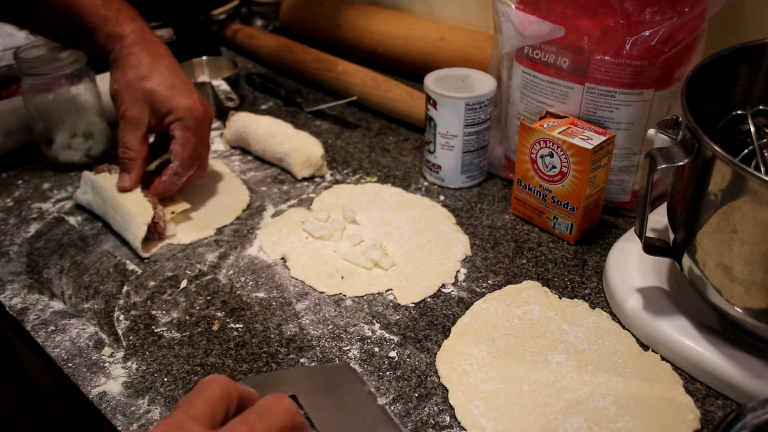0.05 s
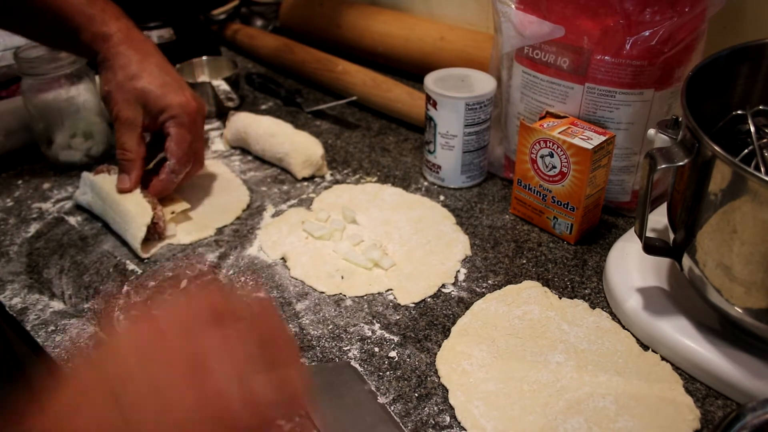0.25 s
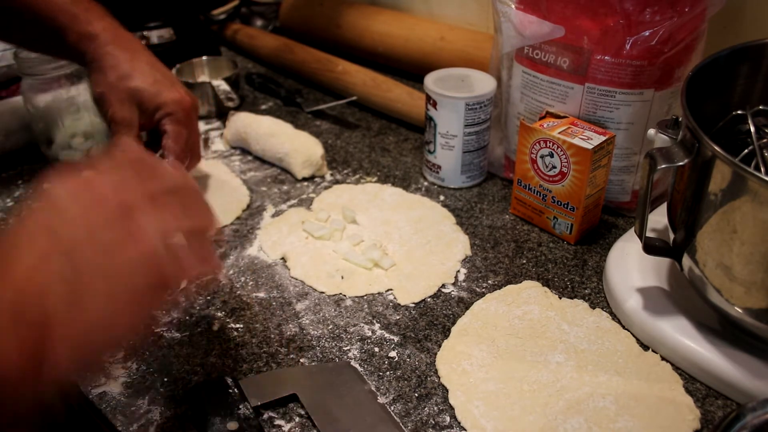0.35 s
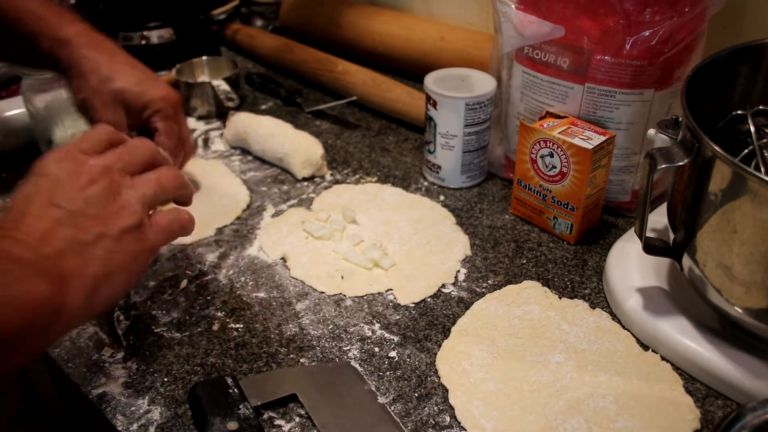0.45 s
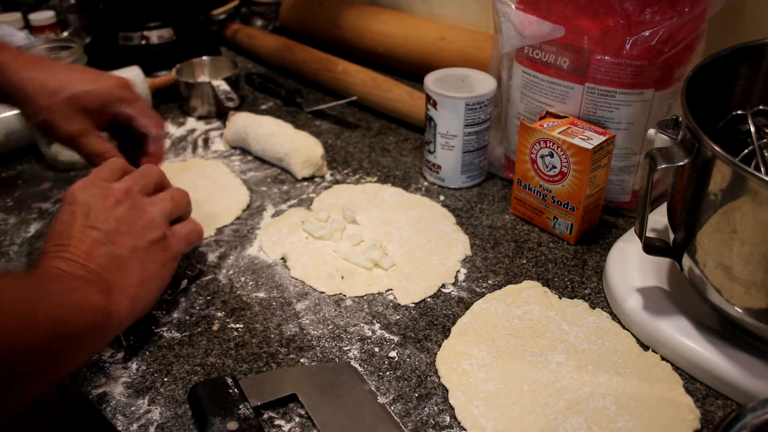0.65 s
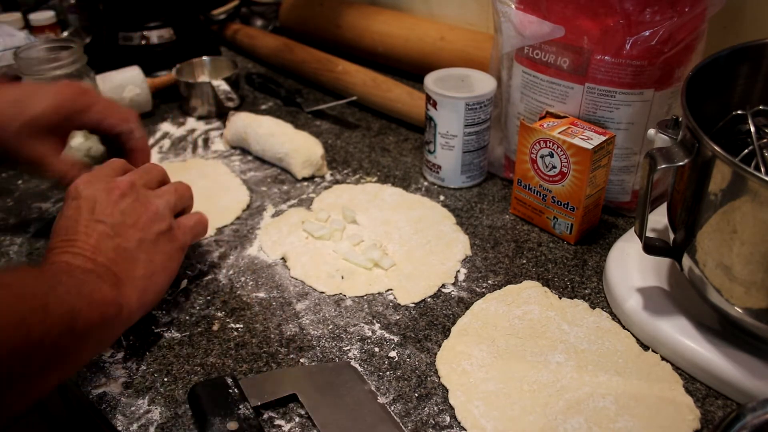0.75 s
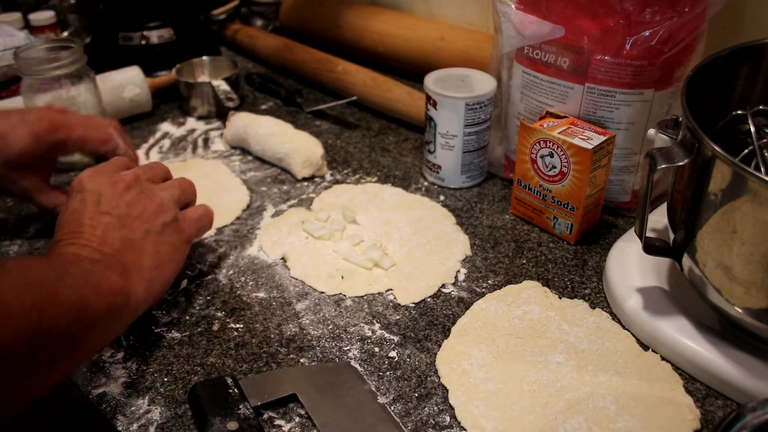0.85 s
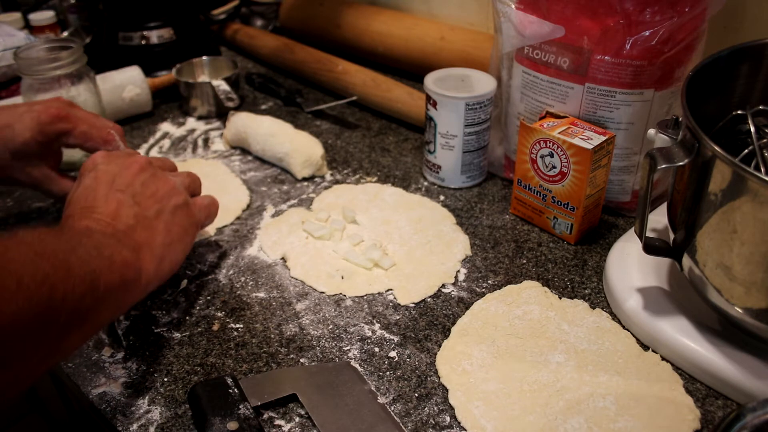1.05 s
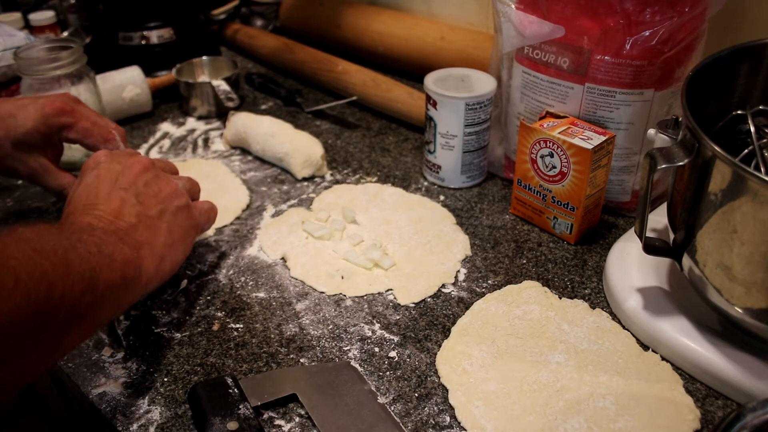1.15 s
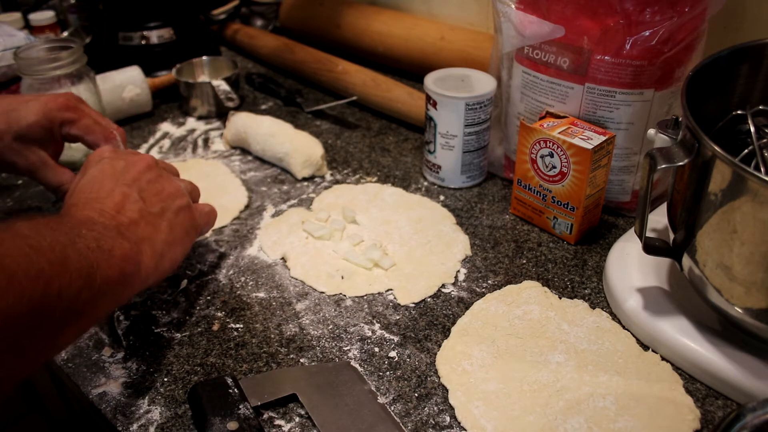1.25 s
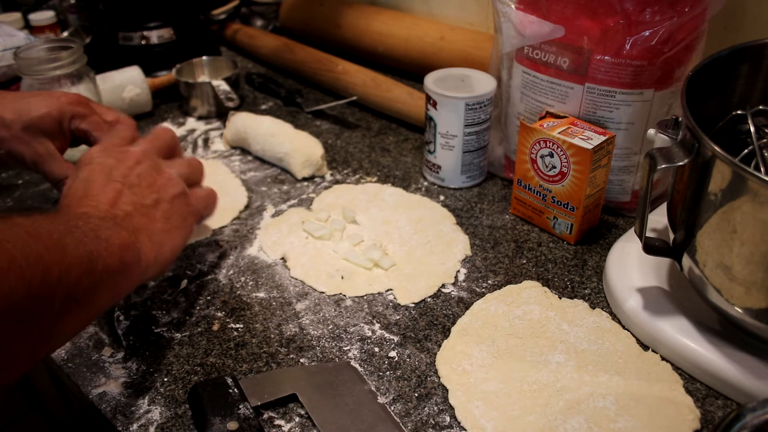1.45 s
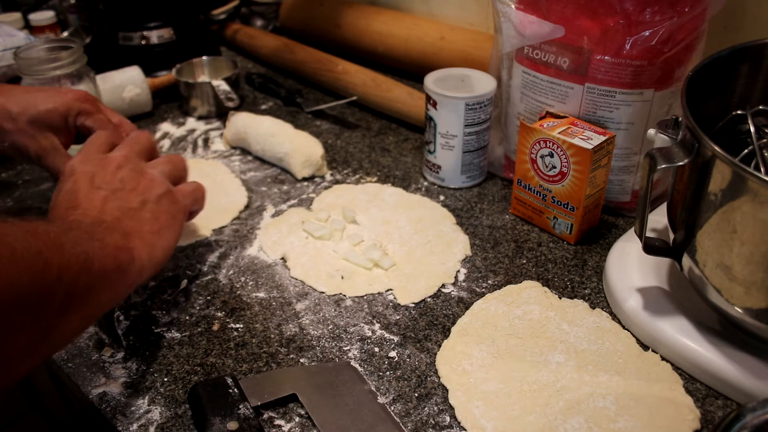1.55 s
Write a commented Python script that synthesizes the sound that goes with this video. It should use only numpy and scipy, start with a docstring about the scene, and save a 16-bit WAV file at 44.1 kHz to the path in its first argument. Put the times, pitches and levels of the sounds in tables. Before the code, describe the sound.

Close stereo pickup of a metal scraper slapped down on stone right at the start, bright and hard, with short room reverberation. Afterwards soft floury hand brushes and pats, a barely audible tink, and quiet appliance hum.

```python
"""A steel dough scraper slides over a stone countertop and is put down: slips, knocks and chatter ring
its modes, with a noise-burst crack. A broad impulse from the stone slab sounds through the room.
Then hands brush and lightly pat floury dough: swells of coloured grains. A faint sine tinks at 1 s.
Noise bursts make the close reflections, banded noise tails the small kitchen, over steady air noise
and the low, wavering sine hum of an appliance."""
import sys
import numpy as np
from scipy import signal
from scipy.fft import rfft, irfft
from scipy.io import wavfile
from scipy.ndimage import uniform_filter1d, minimum_filter1d

SR = 44100
rng = np.random.default_rng(int(sys.argv[2]) if len(sys.argv) > 2 else 0)


def output_pcm(signal):
    """Save a mono or channel-first signal as 16-bit PCM at the path in sys.argv[1].

    Samples are clipped to [-1, 1] before scaling.
    """
    pcm = np.clip(np.atleast_2d(signal).T, -1, 1) * 32767
    wavfile.write(sys.argv[1], SR, np.round(pcm).astype(np.int16))


N = 70560

# Scraper modes. Each row: frequency in Hz, struck level in dB, slid level in dB, undamped t60 in s.
BLADE_MODES = [(271.6, -29.5, -30.5, .35), (731, -2.5, -22, 0.044), (1087, -7.5, -2, 0.068),
               (1286.4, -8, -3, .17), (1421, -2, -2.5, 0.042), (1795, -5.5, -3.5, 0.098),
               (2170, -2.5, -1, 0.027), (2660, -16, -12, 0.12), (2707, -9.5, -4, 0.088),
               (3133, -2.5, -3, .08), (3390, -0.5, -13, 0.081), (3482, -16, -15.5, .09),
               (4020, -1.5, -11, .05), (4035, -6.5, -14, 0.097), (4904, -8.5, -22, 0.074),
               (5866, -20.5, -11, 0.036), (7050, -7.5, -3, 0.068), (7750, -14.5, -7, .04),
               (8460, -41, -7.5, 0.091), (8807, 3.5, -5.5, .05), (9100, 1.5, -20, .06),
               (10210, -2, -6.5, .06), (10820, -5, -17, 0.1)]
# Pressure of the slide. Each row: time in s, level in dB.
SLIDE_PRESSURE = [(0, 0.5), (.03, 1), (.04, 1.5), (.053, 4), (.066, 3), (0.077, -8.5)]
# Colour of edge grit on stone. Each row: frequency in Hz, relative level in dB.
GRIT_COLOUR = [(100, -31.5), (500, -6), (1300, 16), (2200, 2.5), (3300, 12), (4800, -3), (7500, -7),
               (10000, 4), (15000, -6)]
# Contacts as the scraper lands. Each row: time in s, level in dB, contact time in ms.
CONTACTS = [(.0740, -5.5, 0.8), (0.0765, -1, 0.52), (.0803, 5, 0.32), (0.0814, 0, 0.0293),
            (.0840, 5, 0.025), (0.0847, -5, .03)]
# Colour of the crack of steel on stone. Each row: frequency in Hz, level in dB.
CRACK_COLOUR = [(80, -18), (300, -13.5), (700, -3.5), (1300, 8), (1900, -2.5), (2350, -12.5), (3400, 6),
                (5000, -7), (7000, -1.5), (9500, 4), (12500, -3), (16000, -19.5)]
# The hardest blow as the slab throws it into the room. Each row: frequency in Hz, level in dB.
SLAB_COLOUR = [(100, -19), (300, -5), (750, 3.5), (1200, 7), (2200, -2), (3400, 0.5), (5000, -4.5),
               (6500, -0.5), (10000, 0), (15500, -15)]
# Pats and brushes on floury dough. Each row: time in s, level in dB, attack in s, release t60 in s.
PATS = [(0.366, -59.5, 0.031, 0.24), (.57, -54, 0.057, 0.31), (1.188, -55, 0.0043, 0.16),
        (1.225, -56.5, 0.045, 0.21), (1.292, -46.5, 0.0087, 0.24), (1.325, -43.5, .014, 0.21),
        (1.49, -55.5, 0.019, 0.27)]
# Colour of flour grains. Each row: frequency in Hz, relative level in dB.
FLOUR_COLOUR = [(300, -21), (1200, -6), (2300, -7), (3700, 0.5), (4800, -3.5), (6200, 1), (8000, -1),
                (11000, -5), (15500, -22)]
# Colour of close reflections. Each row: frequency in Hz, level in dB.
NEAR_COLOUR = [(200, -9.5), (1200, -2), (4000, 1), (12000, -3)]
# Room tail bands. Each row: centre in Hz, t60 in s, relative level in dB.
ROOM_BANDS = [(150, .5, -22), (500.4, 0.63, -6), (1200, 0.81, 4), (2986, 0.78, 2.5), (4730, 0.58, 5),
              (6390, 0.97, 1.5), (10000, 0.85, 0), (15130, 0.63, 3.5)]
# Colour of the air noise. Each row: frequency in Hz, relative density in dB per Hz.
AIR_COLOUR = [(25, -22), (52, -5.5), (80, -9), (115, -3.5), (150, -3.5), (205, -6.5), (270, -4.5),
              (450, -3.5), (650, -9), (1400, -14.5), (1750, -19), (2500, -22), (3500, -24), (5000, -30),
              (7000, -26), (10500, -26), (15500, -34.5)]
# Width of the air noise. Each row: frequency in Hz, gain of the side noise in dB.
AIR_SIDE = [(60, -7), (500, -7), (2000, 1.5), (8000, 1)]
# Appliance tones. Each row: frequency in Hz, rms level in dB.
HUM_TONES = [(59, -62.5), (146, -66.5), (163, -65.5), (359, -65.5)]

SLIDE_SLIPS_PER_S, SLIDE_RING_DB, SLIDE_GRIT_DB = 5000, -35, -41
SLIDE_RELEASE_S = 0.00403
RING_DB, CRACK_DB, CRACK_FADE_S = -22, 18.5, 0.015
CHATTER_START_S, CHATTER_END_S, CHATTER_HITS_PER_S = 0.09, 0.1232, 1500
CHATTER_START_DB, CHATTER_FALL_DB_PER_S = -33.5, 303.5
DAMPED_T60_S = 0.13  # added damping once the blade lies flat on the stone
RADIATION_HZ = 280  # the thin blade radiates little below this
SPREAD_HZ = 8300  # modes this high reach the two microphones a radian out of step
SLAB_S, SLAB_DB = 0.081, 4
FLOUR_GRAINS_PER_S, HAND_PAN_DB, HAND_ROOM_DB = 9000, -4.5, -10.5
TINK_S, TINK_HZ, TINK_DB, TINK_T60_S = 1, 1680, -58, 0.8
STEEL_PAN_DB, LEAD_MS = -3.5, 0.022  # negative pan: right louder; left earlier
NEAR_DB, NEAR_FADE_S = -7.5, 0.058
STEEL_ROOM_DB, ROOM_RISE_S = -31.5, 0.047
AIR_DB, HUM_WAVER_DB = -53.5, 0.5
CEILING, LIMITER_S, TOP_HZ = 1.05, 0.00092, 15800


def undb(db):
    """Decibels to gain."""
    return 10 ** (np.asarray(db) / 20)


def unit(x):
    """Scale to rms 1."""
    return x / np.sqrt(np.mean(x ** 2))


def fade(t60_s):
    """Exponential decay from time zero."""
    return np.exp(-np.log(1000) * np.arange(N) / SR / t60_s)


def conv(x, response):
    """Pass a sound through an impulse response."""
    return irfft(rfft(x, 2 * N) * rfft(response, 2 * N))[..., :N]


def on_log(hz, points):
    """Read (Hz, value) points on a log-frequency axis."""
    p = np.array(points)
    return np.interp(np.log(np.maximum(hz, 1)), np.log(p[:, 0]), p[:, 1])


def colour(x, points):
    """Filter by a (Hz, dB) curve."""
    gain_db = on_log(np.fft.rfftfreq(N, 1 / SR), points)
    return irfft(rfft(x) * undb(gain_db), N)


def grains(rate_per_s):
    """Random tiny impacts, rms 1."""
    return unit((rng.random(N) < rate_per_s / SR) * rng.standard_normal(N))


def walk(rate_hz):
    """Slow random drift: held random values, smoothed."""
    k = int(SR / rate_hz)
    held = rng.standard_normal(N)[np.arange(N) // k]
    return uniform_filter1d(held, k)


def burst(fade_s, points):
    """Decaying noise, flattened in spectrum, coloured, then faded again at half the dB rate."""
    spectrum = rfft(rng.standard_normal(N) * fade(fade_s))
    flat = irfft(spectrum / np.abs(spectrum), N)
    return colour(flat, points) * np.sqrt(fade(fade_s))


def place(x, pan_db):
    """Level and arrival time differ between the two microphones."""
    delay_s = np.array([[0], [LEAD_MS / 1000]])
    late = np.exp(-2j * np.pi * np.fft.rfftfreq(N, 1 / SR) * delay_s)
    gain_db = np.array([[pan_db], [-pan_db]]) / 2
    return irfft(rfft(x) * late, N) * undb(gain_db)


def blade(slid):
    """Modal ring of the scraper at both microphones after one impulse, struck flat or rubbed on edge."""
    t, ring = np.arange(N) / SR, 0
    for hz, hit_db, slid_db, t60_s in BLADE_MODES:
        phase = rng.choice([-1, 1]) * hz / SPREAD_HZ * np.array([[1], [-1]]) / 2
        level = undb(slid_db if slid else hit_db)
        ring = ring + level * np.cos(2 * np.pi * hz * t + phase) * fade(t60_s)
    return ring


def slide():
    """The edge catches on the floury stone in dense tiny slips that ring the blade."""
    t = np.arange(N) / SR
    times_s, db = np.array(SLIDE_PRESSURE).T
    release = np.clip((times_s[-1] - t) / SLIDE_RELEASE_S + 1, 0, 1)
    pressure = undb(np.interp(t, times_s, db)) * release
    slips = grains(SLIDE_SLIPS_PER_S)
    # circular convolution: slips late in the buffer ring into its start
    ring = unit(irfft(rfft(slips) * rfft(blade(True)), N))
    grit = unit(colour(slips, GRIT_COLOUR))
    return pressure * (undb(SLIDE_RING_DB) * ring + undb(SLIDE_GRIT_DB) * grit)


def appliance():
    """Steady air noise and the wavering hum of a kitchen appliance."""
    t = np.arange(N) / SR
    mid, side = (unit(colour(rng.standard_normal(N), AIR_COLOUR)) for _ in range(2))
    air = undb(AIR_DB) * (mid + colour(side, AIR_SIDE) * np.array([[1], [-1]]))
    hum = 0
    for hz, db in HUM_TONES:
        level = np.sqrt(2) * undb(db + HUM_WAVER_DB * walk(5))
        hum = hum + level * np.sin(2 * np.pi * hz * t + 0.6 * walk(4.3))
    return air + hum


def clack():
    """Soft handle knocks, hard blade contacts, then a chatter that is damped as the blade settles."""
    t, hz = np.arange(N) / SR, np.fft.rfftfreq(N, 1 / SR)
    force = 0
    for at_s, db, contact_ms in CONTACTS:
        softness = 1 + (hz * contact_ms / 1000) ** 4  # longer contact, duller blow
        force = force + irfft(undb(db) * np.exp(-2j * np.pi * hz * at_s) / softness, N)
    settling = (t > CHATTER_START_S) * np.clip((CHATTER_END_S - t) / 0.012, 0, 1)
    chatter_db = CHATTER_START_DB - CHATTER_FALL_DB_PER_S * np.maximum(t - CHATTER_START_S, 0)
    force = force + grains(CHATTER_HITS_PER_S) * settling * undb(chatter_db)
    damping = np.exp(-np.log(1000) * np.maximum(t - CHATTER_END_S, 0) / DAMPED_T60_S)
    response = undb(RING_DB) * blade(False) + undb(CRACK_DB) * burst(CRACK_FADE_S, CRACK_COLOUR)
    return damping * conv(force, response)


def slab():
    """One broad coloured impulse from the stone slab, to be heard through the room."""
    blow = (np.arange(N) == int(SLAB_S * SR)).astype(float)
    return undb(SLAB_DB) * colour(blow, SLAB_COLOUR)


def hands():
    """Each pat or brush rubs a swell of fine flour grains; swells add in power."""
    t = np.arange(N) / SR
    power = 0
    for at_s, db, attack_s, t60_s in PATS:
        attack = (np.minimum(t - at_s, 0) / attack_s) ** 2
        release = np.log(1000) * np.maximum(t - at_s, 0) / t60_s
        power = power + (undb(db) * np.exp(-attack - release)) ** 2
    return np.sqrt(power) * unit(colour(grains(FLOUR_GRAINS_PER_S), FLOUR_COLOUR))


def tink():
    """A faint ring, perhaps a nudged utensil: a phase-drifting sine, sudden start, slow decay."""
    t = np.arange(N) / SR - TINK_S
    tone = np.sin(2 * np.pi * TINK_HZ * t + walk(25.7))
    decay = np.exp(-np.log(1000) * np.abs(t) / TINK_T60_S)
    return (t > 0) * undb(TINK_DB) * tone * decay


def worktop():
    """Quick reflections from the tins, bowl and wall close by, different at each microphone."""
    return np.array([burst(NEAR_FADE_S, NEAR_COLOUR), burst(NEAR_FADE_S, NEAR_COLOUR)])


def kitchen():
    """Stereo room response of unit energy: a diffuse tail with its own decay in each band."""
    t, hz = np.arange(N) / SR, np.fft.rfftfreq(N, 1 / SR)
    noise, tail = rfft(rng.standard_normal((2, N))), 0
    for k, (_, t60_s, db) in enumerate(ROOM_BANDS):
        # triangular crossfade between neighbouring bands
        share = on_log(hz, [(row[0], float(j == k)) for j, row in enumerate(ROOM_BANDS)])
        tail = tail + irfft(noise * share, N) * fade(t60_s) * undb(db)
    return unit(tail * np.minimum(t / ROOM_RISE_S, 1)) / np.sqrt(N)


def scene():
    """Scraper and hands on the worktop, in the kitchen."""
    room, close, dough = kitchen(), worktop(), hands()
    highpass = signal.butter(2, RADIATION_HZ, "highpass", fs=SR, output="sos")
    steel = signal.sosfilt(highpass, slide() + clack())
    direct = place(steel, STEEL_PAN_DB)
    scraper = direct + undb(NEAR_DB) * conv(direct, close)
    reverb = conv(undb(STEEL_ROOM_DB) * steel + slab() + undb(HAND_ROOM_DB) * dough, room)
    return scraper + place(dough, HAND_PAN_DB) + reverb + tink() + appliance()


def record(dry):
    """A fast limiter, gain shared by both channels, holds the loudest peaks down; the top is cut."""
    size = int(LIMITER_S * SR) + 1
    gain = CEILING / np.maximum(np.abs(dry).max(axis=0), CEILING)
    held = dry * uniform_filter1d(minimum_filter1d(gain, size), size)
    lowpass = signal.ellip(10, 0.2, 80, TOP_HZ, fs=SR, output="sos")
    return signal.sosfilt(lowpass, held)


dry = scene()
out = record(dry)
output_pcm(out)
```